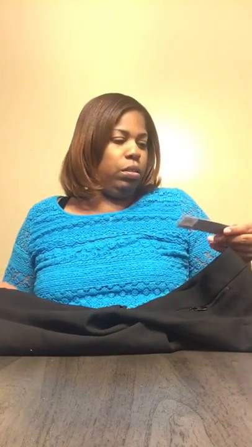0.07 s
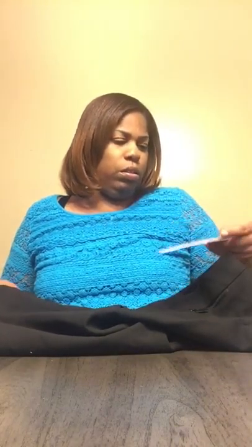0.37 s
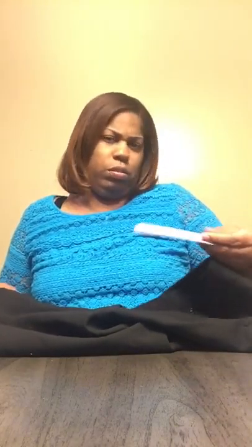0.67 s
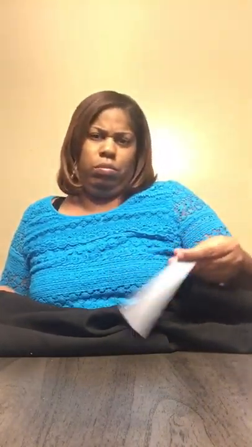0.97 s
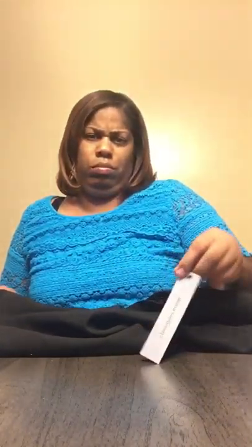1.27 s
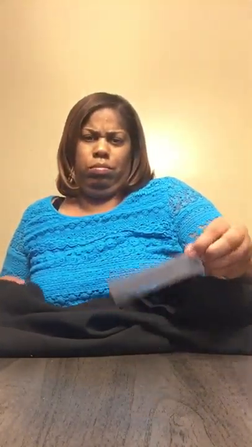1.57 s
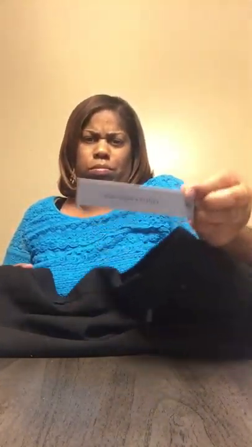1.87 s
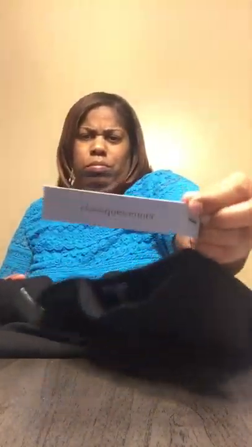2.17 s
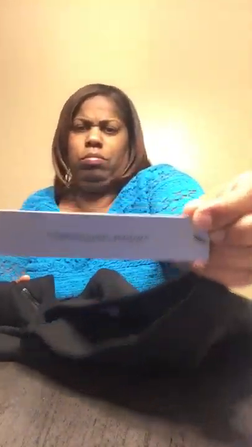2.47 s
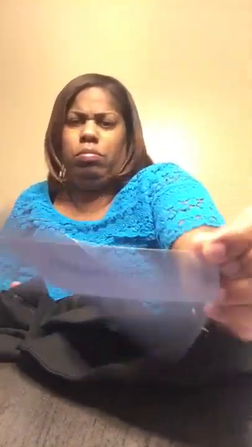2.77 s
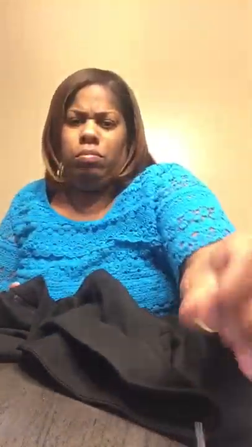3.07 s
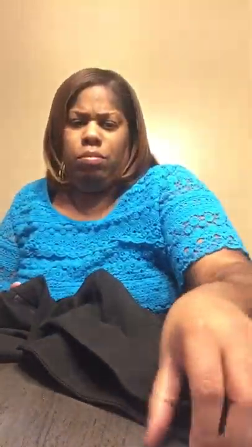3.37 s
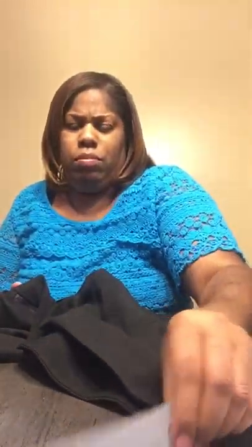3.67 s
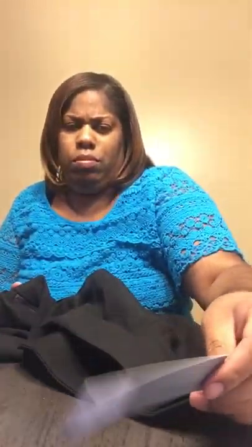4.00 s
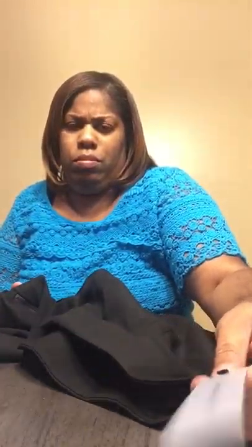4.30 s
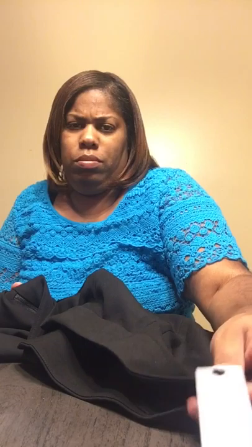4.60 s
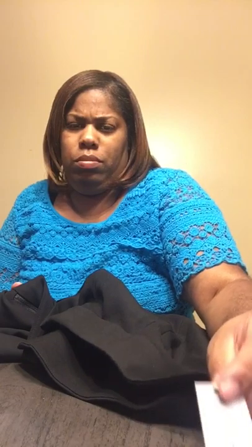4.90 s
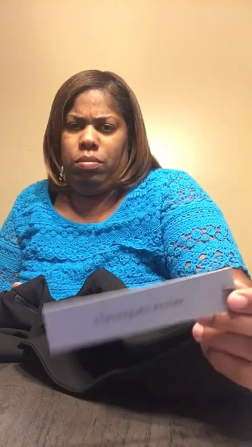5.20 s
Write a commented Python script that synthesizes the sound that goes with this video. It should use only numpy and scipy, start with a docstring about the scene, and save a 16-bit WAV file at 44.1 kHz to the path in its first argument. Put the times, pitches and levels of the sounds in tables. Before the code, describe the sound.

A stiff paper tag ticks, scrapes and taps on a wooden table while cloth rustles softly in a quiet room.

```python
"""A stiff paper tag on a pair of trousers is handled over a table in a small, quiet room.
The card ticks and clatters as flicks ring its modes, and scrapes as it slides between fingers.
Hand and card knock on the table top and drag across it, waking the low modes of the wood.
Underneath, cloth rustles as its weave rubs, over room air and a low hum."""
import sys
import numpy as np
from scipy import signal
from scipy.fft import rfft, irfft
from scipy.io import wavfile
from scipy.ndimage import uniform_filter1d

SR = 44100
rng = np.random.default_rng(int(sys.argv[2]) if len(sys.argv) > 2 else 0)


def pcm_store(signal):
    """Save signal as 16-bit PCM."""
    levels = np.round(np.clip(np.atleast_2d(signal), -1, 1) * 32767)
    wavfile.write(sys.argv[1], SR, levels.astype(np.int16).T)


N = 240212
TIME = np.arange(N) / SR

# tone of the room air: f/Hz, level/dB
AIR_EQ = [(20, -34), (28, -11), (45, -0.5), (75, 3.5), (100, -12.5), (135, 7.5), (160, -1.5), (185, 3),
          (230, 2.5), (320, 3), (430, -8), (700, -7.5), (1100, -18.5), (3200, -22), (4800, -27.5),
          (6400, -31), (16000, -44.5)]
# level of the hum as it wavers and dips: t/s, level/dB
HUM_LEVELS = [(0.0, -57), (0.04, -56), (1.14, -60.5), (1.27, -83), (1.35, -56.5), (2.05, -52.5),
              (2.81, -56.5), (3.03, -53.5), (3.14, -70), (3.46, -55), (3.52, -63.5), (4.23, -57),
              (5.37, -56.5), (5.45, -61)]
# soft rustling swells, first the wash after the tag's flick, then the trousers shifting:
# t/s, length/s, rustle/dB, fizz/dB
RUSTLE_SWELLS = [(0.405, 0.13, -59.5, -88), (1.67, 1.0, -71, -84), (2.705, 0.43, -57, -72),
                 (3.332, 0.36, -56.5, -74), (4.484, 0.49, -65, -87), (4.909, 0.39, -63, -68.5)]
# tones of the rustle and of the card's scrape, fizz, crack and snap: f/Hz, level/dB
RUSTLE_EQ = [(300, -12), (1100, -5), (1700, 3), (2500, 4), (3400, -2.5), (4200, -8), (5000, -10.5),
             (9000, -14.5), (17000, -72)]
SCRAPE_EQ = [(300, -7), (800, -6), (1100, -29), (1500, 7.5), (1850, -20), (2200, 1.5), (3200, 0.5),
             (4200, 1), (5000, -22), (9000, -43), (17000, -40)]
FIZZ_EQ = [(1500, -11.5), (4000, -2), (5000, -3), (7000, -7.5), (9000, -11), (12000, -10.5), (15000, -20),
           (17500, -18)]
CRACK_EQ = [(300, -32), (900, 1), (1500, 2.5), (2000, 0.5), (2550, 6.5), (3200, 4), (4200, -1.5),
            (5000, -4), (7000, -32), (16000, -90.5)]
SNAP_EQ = [(1500, -51), (4000, -15), (5000, -4.5), (5700, -5.5), (7000, -4.5), (9000, -10.5), (10300, -11),
           (12000, -18), (15000, -20), (17500, -33)]  # also colours the rustle's fizz
# the card slides: t/s, length/s, scrape/dB, fizz/dB, crest/share of length, fizz f/Hz, ring f/Hz
CARD_STROKES = [(0.022, 0.062, -88, -72.5, 0.7, 6200, 3000), (0.404, 0.04, -66, -56.5, 0.83, 5870, 2550),
                (0.423, 0.026, -56, -65, 0.6, 10000, 2800), (0.726, 0.069, -90, -65.5, 0.55, 10100, 2550),
                (1.01, 0.044, -68, -70, 0.5, 6200, 3700), (1.078, 0.016, -62.5, -76, .45, 6500, 2200),
                (1.3, 0.084, -59, -61.5, 0.7, 7200, 2200), (2.856, 0.033, -47.5, -53.5, 0.37, 7700, 2530),
                (2.886, 0.12, -43.5, -51.5, 0.46, 7000, 2550), (3.291, 0.048, -82, -61.5, 0.2, 7850, 2550),
                (3.477, 0.097, -57.5, -63.5, 0.48, 8100, 2500),
                (3.545, 0.061, -57, -61.5, 0.63, 9500, 2500), (3.637, 0.028, -55, -57, 0.64, 8000, 3740),
                (3.653, 0.074, -57.5, -60.5, 0.6, 8300, 3830), (3.692, 0.04, -54, -56, 0.53, 6160, 2780),
                (4.217, 0.07, -67, -66, 0.17, 9460, 2570), (4.354, 0.051, -70, -69, 0.2, 8800, 2550),
                (4.406, 0.084, -62.5, -75, 1, 7040, 2930), (4.482, 0.024, -39.5, -43, 0.39, 9000, 2580),
                (4.497, 0.027, -41, -48, 0.5, 8500, 2600), (4.594, 0.15, -61, -73, 0.46, 6000, 3300),
                (4.94, 0.06, -63.5, -79, 0.75, 7000, 2550), (5.125, 0.047, -56.5, -63, 0.5, 7000, 2550)]
# modes of the card: f/Hz, level/dB
CARD_MODES = [(1335, -3.5), (1560, -6.5), (1812, 3), (1960, 3), (2140, 3), (2331, -1), (2680, -6),
              (2890, 0), (3190, 2), (3769, 1.5), (4200, -7)]
# the card flicks or strikes: t/s, level/dB, snap/dB, t60/s (short when pinched, long when free),
# centre f/Hz, fall-off/(dB per octave)
CARD_FLICKS = [(0.429, -58, -77, 0.065, 1490, 59), (0.4307, -54, -58, 0.03, 2620, 22),
               (0.441, -59.5, -71, 0.16, 2800, 72), (1.0313, -58, -78, 0.006, 3820, 16),
               (1.0377, -64, -72, 0.0067, 3200, 9.4), (1.18, -54.5, -72, 0.021, 2650, 34),
               (1.254, -59, -70, 0.022, 2340, 66), (1.274, -52, -61.5, 0.014, 2430, 49),
               (1.312, -60, -58.5, .04, 2580, 48), (1.323, -56.5, -65, 0.034, 2200, 35),
               (1.351, -48.5, -54, 0.01, 2340, 29), (1.365, -49.5, -62, 0.015, 1920, 53),
               (1.448, -56, -70, 0.039, 2030, 7.5), (1.997, -51.5, -62, 0.0052, 2970, 15),
               (2.729, -42, -61.5, 0.0087, 2790, 1.5), (2.7542, -61, -58, .01, 3500, 8.8),
               (2.758, -46, -65, .006, 3060, 9.7), (2.764, -42.5, -55.5, 0.013, 3220, 59),
               (2.79, -45, -73, 0.065, 2300, 4.9), (2.867, -50, -52, .012, 3200, 8),
               (2.875, -54, -56, 0.017, 1650, 20), (2.896, -39, -73, 0.013, 2980, 6.3),
               (2.905, -19, -48.5, 0.021, 2060, 4.1), (2.9079, -26.5, -47, 0.017, 3080, 12),
               (2.919, -37, -50, 0.028, 2300, 3.9), (3.0006, -36, -52.5, 0.031, 2460, 8.5),
               (3.006, -48, -53, 0.01, 2500, 6), (3.045, -55, -64, .012, 2600, 8),
               (3.0685, -32, -48, 0.036, 2280, 2.7), (3.0726, -28.5, -42.5, 0.024, 2670, 1.6),
               (3.085, -62, -58, .012, 2600, 6), (3.1119, -38.5, -57, 0.021, 2730, 2.6),
               (3.117, -41, -61, 0.0066, 2950, 7.8), (3.2512, -59.5, -54, .0096, 4100, 32),
               (3.2753, -68, -55, 0.024, 4000, 20), (3.283, -73, -62, .01, 4000, 20),
               (3.296, -57, -52, 0.013, 2970, 15), (3.3492, -46.5, -66, 0.04, 1660, 9.4),
               (3.502, -65, -70, 0.018, 1980, 8.6), (3.5077, -50, -68, 0.017, 2200, 7),
               (3.5133, -58, -66, 0.0058, 3240, 8), (3.521, -66, -58, .01, 3700, 15),
               (3.545, -60, -68, .008, 3200, 6.7), (3.575, -54, -63, .008, 2800, 10),
               (3.589, -54, -63, .008, 2600, 5.6), (3.701, -56, -62, 0.011, 3000, 8),
               (3.7132, -49, -63, 0.0087, 1830, 14), (3.725, -55, -64, .008, 2780, 6),
               (3.7556, -53, -69, 0.036, 2650, 14), (3.763, -63.5, -73, 0.013, 2650, 7.2),
               (3.985, -63, -62.5, 0.034, 2620, 10), (4.25, -50.5, -74.5, 0.014, 2190, 8.6),
               (4.3473, -53.5, -67.5, 0.0066, 3640, 7.9), (4.362, -54, -80, 0.0085, 3730, 9.4),
               (4.4888, -53, -44, 0.015, 2900, 5.4), (4.5132, -42, -66, 0.044, 1690, 5.7),
               (4.526, -56, -59, 0.018, 3200, 8.7), (4.557, -47, -58, 0.035, 1680, 3.7),
               (4.661, -57, -66, .025, 2200, 3.7), (4.708, -68, -69, .01, 3220, 8),
               (4.78, -65, -68, 0.013, 3250, 8), (4.9668, -58, -66, .012, 2400, 5.3),
               (4.984, -59, -81, 0.013, 2410, 8.9), (5.324, -61, -61.5, .02, 4180, 5.4)]
# modes of the table top: f/Hz, level/dB, t60/s
TABLE_MODES = [(88, -6, .13), (185, -18, .14), (222, -12, .08), (249, 2.5, .115), (290, -11, .08),
               (350, -3.5, .08), (405, -8, .07), (491, -1.5, .15), (645, -13, .1), (705, -5.5, .12),
               (790, -12, .06), (872, -8, .1), (990, -19, .05), (1085, -13, .06)]
# drags on the table: t/s, length/s, level/dB, centre f/Hz, fall-off/(dB per octave), crest/share of length
TABLE_DRAGS = [(1.179, 0.19, -55.5, 170, 53, 0.9), (2.728, 0.11, -49.5, 490, 4.5, 0),
               (2.892, 0.15, -52.5, 810, 17, 0.8), (3.339, 0.093, -46, 288, 11, 1),
               (3.495, 0.11, -42.5, 434, 6.5, 0.66), (4.482, 0.015, -49.5, 705, 29, .5),
               (4.555, 0.13, -57.5, 354, 11, 0.1), (5.018, 0.16, -62.5, 400, 5, .8)]
# knocks on the table: t/s, level/dB, centre f/Hz, fall-off/(dB per octave), pitch/ratio
TABLE_KNOCKS = [(1.182, -38, 257, 3, 1.05), (1.211, -46.5, 260, 18, 1.04), (2.729, -44, 520, 1, 1.27),
                (2.905, -30, 527, 3.5, 1), (2.92, -33.5, 330, 13, 0.91), (3.003, -29, 268, 4, 1),
                (3.045, -39.5, 248, 27, 0.98), (3.071, -31.5, 420, 0, 0.99), (3.294, -48.5, 275, 13, 1),
                (3.351, -29, 255, 12, 1.02), (3.395, -64, 252, 5, 2), (3.422, -48, 310, 14, 1.34),
                (3.501, -43, 450, -1, 1), (3.577, -40, 280, 18, 1.09), (3.758, -48, 302, 6.5, 1),
                (4.514, -43, 314, 6, 1.04), (4.571, -46.5, 264, 18, 0.98), (4.973, -44, 259, 11.5, 1.03),
                (5.155, -57, 450, 18, 1.01)]
# decay of the room: f/Hz, t60/s
ROOM_DECAY = [(150, 0.67), (500, 0.84), (2500, 0.86), (5000, 0.43), (14000, 1)]
# early reflections: delay/s, level/dB
REFLECTIONS = [(.0032, -30), (.0075, -20), (0.017, -19)]
# dips in the microphone's treble: f/Hz, Q
MIC_DIPS = [(4950, 10.7), (10300, 19)]


def amp(db):
    """Decibels to gain."""
    return 10 ** (np.asarray(db) / 20)


def unit_rms(x, head=None):
    """Scales to rms 1, judged over the first head samples if given."""
    return x / np.sqrt(np.mean(x[:head] ** 2) + 1e-20)


def level_at(curve, hz):
    """Reads a curve on a log-frequency axis."""
    f, value = np.transpose(curve)
    return np.interp(np.log(hz + 1), np.log(f + 1), value)


def add(mix, s, sound):
    """Mixes a sound in at time s."""
    part = mix[max(round(s * SR), 0):][:len(sound)]
    part += sound[:len(part)]


def cut(x, hz, kind, order):
    """Causal low-pass or high-pass."""
    return signal.sosfilt(signal.butter(order, hz, kind, fs=SR, output="sos"), x)


def colour(x, eq, centre_hz=1000, slope_db=0, size=4096):
    """Minimum-phase EQ, with an extra fall of slope_db per octave either side of a centre."""
    hz = abs(np.fft.fftfreq(size, 1 / SR))
    gain_db = level_at(eq, hz) - slope_db * abs(np.log2((hz + 1) / centre_hz))
    log_gain = np.log(amp(np.maximum(gain_db, -110)))
    taps = np.fft.ifft(np.exp(signal.hilbert(log_gain).conj())).real[:size // 2]
    return signal.oaconvolve(x, taps)[:len(x)]


def air_and_hum(air_db=-57.5, hum_hz=58.5):
    """The bed: steady room air and a low hum whose level wavers and dips."""
    air_tone = amp(level_at(AIR_EQ, np.fft.rfftfreq(N, 1 / SR)))
    air = irfft(rfft(rng.standard_normal(N)) * air_tone, N)
    hum = np.sqrt(2) * np.sin(2 * np.pi * hum_hz * TIME)
    hum_db = np.interp(TIME, *np.transpose(HUM_LEVELS))
    return amp(air_db) * unit_rms(air) + amp(hum_db) * hum


def friction(per_s, spread_db, hiss=0):
    """Fibres catch and let go: tiny slips of uneven size, with optional smooth hiss."""
    sizes = amp(spread_db * np.minimum(rng.exponential(1, N), 4))
    slips = rng.standard_normal(N) * sizes * (rng.random(N) < per_s / SR)
    return unit_rms(unit_rms(slips) + hiss * rng.standard_normal(N))


def pressure(depth_db, size=440):
    """Contact pressure wanders: a random gain, smoothed over size samples."""
    wander = uniform_filter1d(uniform_filter1d(rng.standard_normal(N), size), size)
    return amp(depth_db * unit_rms(wander))


def rustling(held_rustle_db=-75.5, held_fizz_db=-80, crinkle_db=-17, rise_s=0.045, fall_s=0.18):
    """Held cloth rubs and crinkles faintly; the same texture swells for the tag's wash and cloth moves."""
    rustle, fizz = amp(held_rustle_db), amp(held_fizz_db)
    for s, length, rustle_db, fizz_db in RUSTLE_SWELLS:
        swell = np.clip(np.minimum((TIME - s) / rise_s, (s + length - TIME) / fall_s), 0, 1)
        rustle = np.hypot(rustle, amp(rustle_db) * swell)
        fizz = np.hypot(fizz, amp(fizz_db) * swell)
    weave = friction(per_s=5100, spread_db=2, hiss=3.3) * pressure(depth_db=2)
    fibres = unit_rms(weave) + amp(crinkle_db) * friction(per_s=45, spread_db=3)
    return rustle * unit_rms(colour(fibres, RUSTLE_EQ)) + fizz * unit_rms(colour(fibres, SNAP_EQ))


def stroke_speed(s, length, crest):
    """A hand speeds up to its crest and slows to rest."""
    return np.interp(TIME, [s, s + length * np.clip(crest, .05, .95), s + length], [0, 1, 0])


def card_ring(centre_hz, t60, slope_db, faint_db=-20, faint_t60=0.011):
    """The card's modes, favoured around a centre, die on a main decay plus a faint short one."""
    t = np.arange(SR // 5) / SR
    detune = 1 + 0.0025 * rng.standard_normal(len(CARD_MODES))  # the grip bends the card
    phases = 2 * np.pi * rng.random(len(CARD_MODES))
    ring = sum(amp(db - slope_db * abs(np.log2(hz / centre_hz))) * np.sin(2 * np.pi * hz * d * t + p)
               for (hz, db), d, p in zip(CARD_MODES, detune, phases))
    fade = amp(-60 * t / max(t60, .006)) + amp(faint_db - 60 * t / faint_t60)
    return cut(cut(ring * fade, 5380, "low", order=8), 450, "high", order=2)


def card_slides(speed_power=0.8, ring_db=-2):
    """Finger friction makes the card scrape and ring; its edge fizzes at a pitch set by the grip."""
    grain = friction(per_s=7000, spread_db=4, hiss=0.6) * pressure(depth_db=1.8, size=110)
    crackle = friction(per_s=350, spread_db=2)
    slips = unit_rms(grain + .55 * crackle)
    rub = unit_rms(colour(slips, SCRAPE_EQ))
    out = np.zeros(N)
    for s, length, scrape_db, fizz_db, crest, fizz_hz, ring_hz in CARD_STROKES:
        speed = stroke_speed(s, length, crest)
        on = speed > 0
        ring = signal.oaconvolve(slips[on], card_ring(ring_hz, t60=0.034, slope_db=5))[:on.sum()]
        scrape = unit_rms(rub[on] + amp(ring_db) * unit_rms(ring))
        fizz = unit_rms(colour(slips[on], FIZZ_EQ, fizz_hz, slope_db=7))
        out[on] += speed[on] ** speed_power * (amp(scrape_db) * scrape + amp(fizz_db) * fizz)
    return out


def card_ticks(crack_db=-3, crack_t60=0.018, snap_t60=0.011):
    """Each flick rings the card, with a short crack around the same pitch and a bright edge snap."""
    out, t = np.zeros(N), np.arange(SR // 5) / SR
    attack = 265  # samples: the first 6 ms set each layer's level
    for s, db, snap_db, t60, centre_hz, slope_db in CARD_FLICKS:
        crack, snap = rng.standard_normal((2, len(t)))
        crack = unit_rms(colour(crack * amp(-60 * t / crack_t60), CRACK_EQ, centre_hz, slope_db), attack)
        snap = unit_rms(colour(snap * amp(-60 * t / snap_t60), SNAP_EQ), attack)
        body = unit_rms(card_ring(centre_hz, t60, slope_db), attack) + amp(crack_db) * crack
        add(out, s, amp(db) * unit_rms(body, attack) + amp(snap_db) * snap)
    return out


def table_ring(centre_hz, sustain, slope_db, pitch, bend=0, bend_s=0.003, size=14700):
    """The table top's modes swell and decay, starting sharp by the share bend and sagging to pitch."""
    t = np.arange(size) / SR
    bent_time = pitch * (t + bend * bend_s * (1 - np.exp(-t / bend_s)))
    spot_dbs = 2.27 * rng.standard_normal(len(TABLE_MODES))  # each spot has its own balance
    ring = np.zeros(size)
    for (hz, db, t60), spot_db in zip(TABLE_MODES, spot_dbs):
        mode_db = db + spot_db - slope_db * abs(np.log2(hz / centre_hz))
        swell = 1 - np.exp(-t * hz / 0.27)  # opens within the first cycle
        ring += amp(mode_db - 60 * t / (t60 * sustain)) * swell * np.sin(2 * np.pi * hz * bent_time)
    return cut(ring, 61, "high", order=2)


def table_drags(speed_power=0.24, sustain=0.8, spot_s=0.02, spot_detune=0.018):
    """Skin or card slips on the wood, which grumbles; the hand's weight detunes each spot it crosses."""
    slips = friction(per_s=2300, spread_db=2, hiss=0.31) * pressure(depth_db=4.5, size=150)
    out, step = np.zeros(N), round(spot_s * SR)
    for s, length, db, centre_hz, slope_db, crest in TABLE_DRAGS:
        speed = stroke_speed(s, length, crest)
        push = (slips * speed ** speed_power)[speed > 0]
        grumble = np.zeros(SR // 2)
        for k, detune in enumerate(spot_detune * rng.standard_normal(10)):
            spot = table_ring(centre_hz, sustain, slope_db, 1 + detune, size=5000)
            add(grumble, k * spot_s, signal.fftconvolve(push[k * step:(k + 1) * step], spot))
        add(out, s, amp(db) * unit_rms(grumble, head=len(push)))
    return out


def table_knocks(firm_hz=394, sway_hz=56.2, sway_db=-27, sway_t60=0.4):
    """A soft hand wakes the low modes, the card's edge the high ones; the whole table sways after."""
    out, t = np.zeros(N), TIME[:SR]
    sway_envelope = amp(sway_db - 60 * t / sway_t60) * (1 - np.exp(-t * sway_hz))
    sway = sway_envelope * np.sin(2 * np.pi * sway_hz * t)
    for s, db, centre_hz, slope_db, pitch in TABLE_KNOCKS:
        sustain = 0.97 * (centre_hz / firm_hz) ** 0.31  # a softer, lower blow damps the top
        soft_db = 21 * np.log2(firm_hz / centre_hz)  # and sways the table more
        ring = table_ring(centre_hz, sustain, slope_db, pitch, bend=0.49)
        add(out, s, amp(db) * unit_rms(ring, head=700))
        add(out, s, amp(db + soft_db) * sway)
    return out


def room(x, tail_db=-15, build_s=0.004):
    """A few near reflections, then a diffuse tail that dies fastest around 5 kHz."""
    hz, t, bands = signal.stft(rng.standard_normal(SR * 3 // 4), SR, nperseg=256)
    bands = bands * amp(-60 * t / level_at(ROOM_DECAY, hz)[:, None]) * (1 - np.exp(-t / build_s))
    tail = signal.istft(bands, SR, nperseg=256)[1]
    response = amp(tail_db) * tail / np.linalg.norm(tail)
    for delay, db in REFLECTIONS:
        add(response, delay, amp([db]))
    return x + signal.oaconvolve(x, response)[:N]


def scene():
    """Mono mix: card and table go through the room; the rustle and the bed stay dry."""
    handling = card_ticks() + table_knocks() + card_slides() + table_drags()
    return (room(handling) + rustling() + air_and_hum())[None]


def record(dry, top_hz=17200):
    """The microphone's two narrow treble dips, then a steep high cut."""
    for hz, q in MIC_DIPS:
        notched = signal.lfilter(*signal.iirnotch(hz, q, fs=SR), dry)
        dry = .68 * notched + .32 * dry
    high_cut = signal.firwin(511, top_hz, window=("kaiser", 9), fs=SR)
    return signal.oaconvolve(dry, high_cut[None], "same")


dry = scene()
out = record(dry)
pcm_store(out)
```